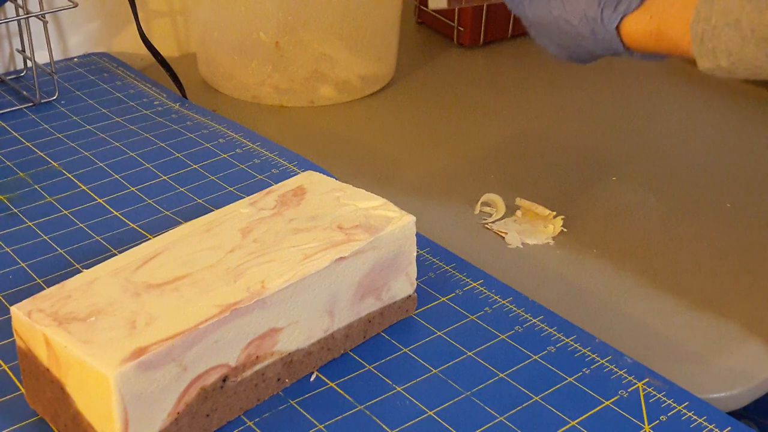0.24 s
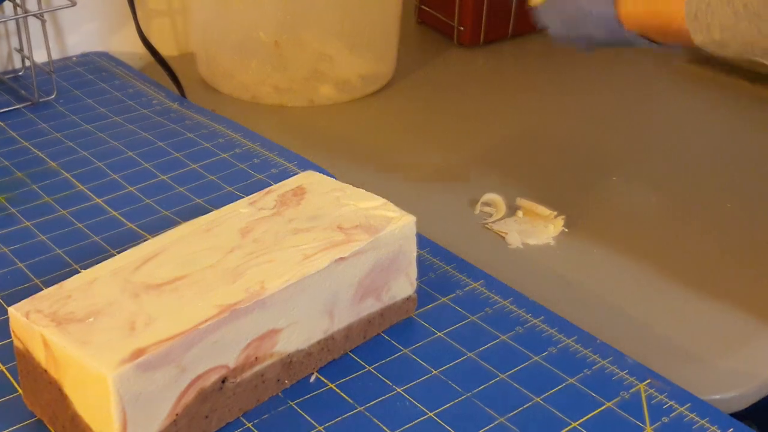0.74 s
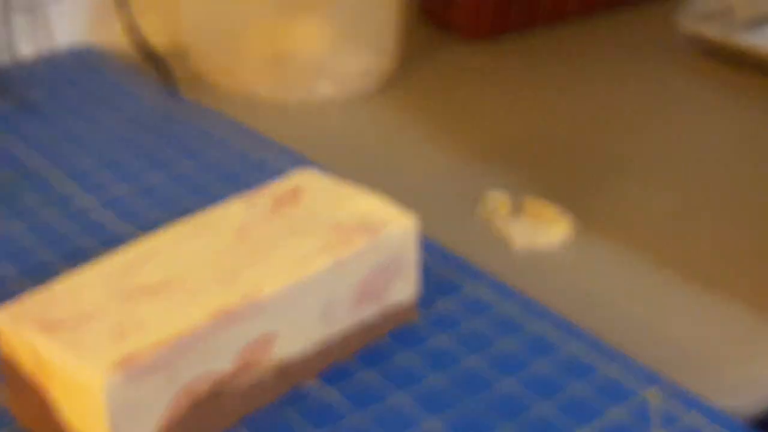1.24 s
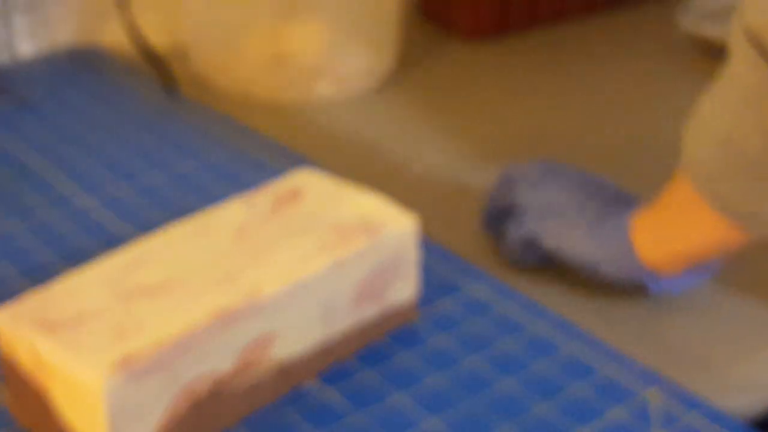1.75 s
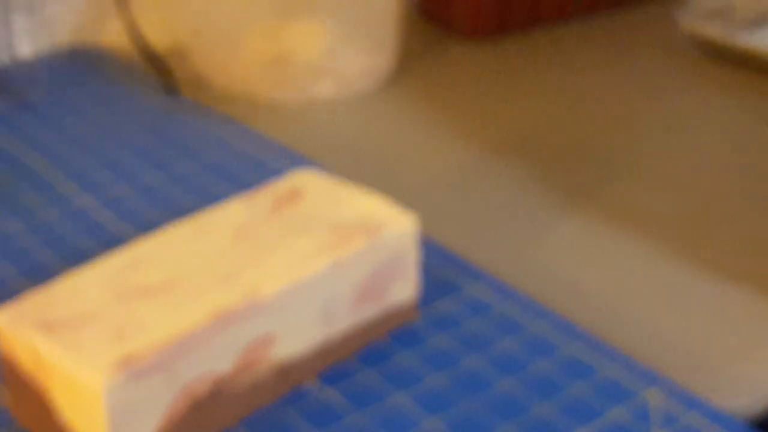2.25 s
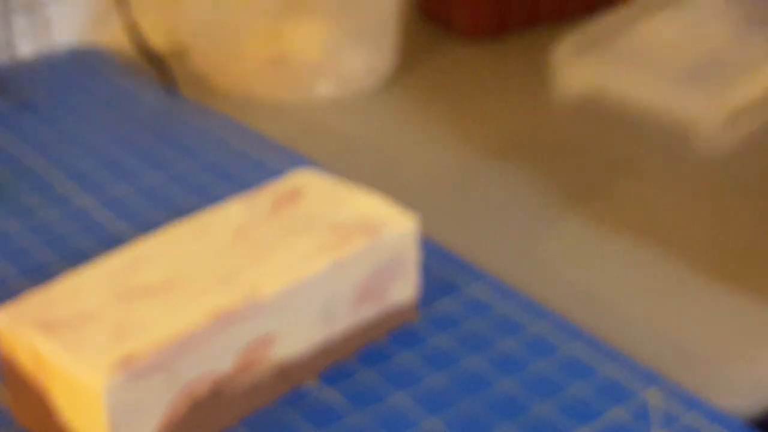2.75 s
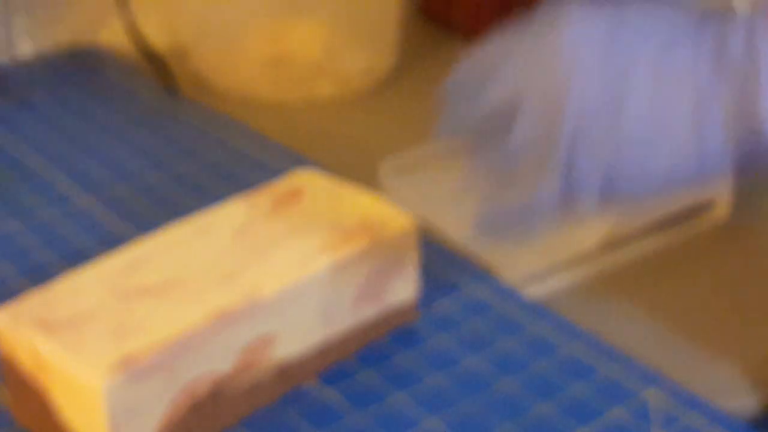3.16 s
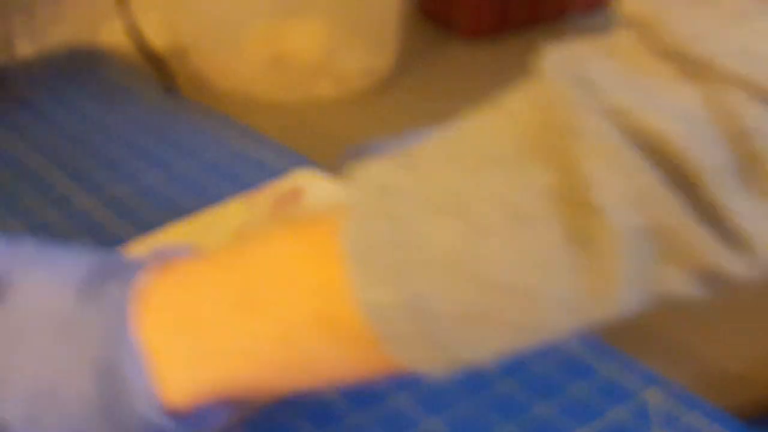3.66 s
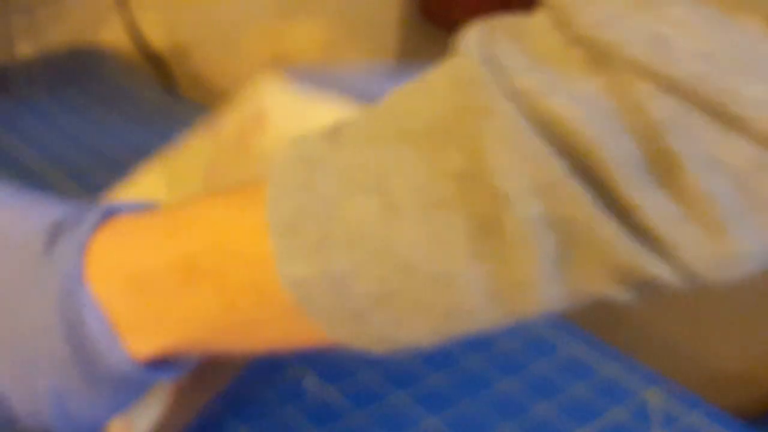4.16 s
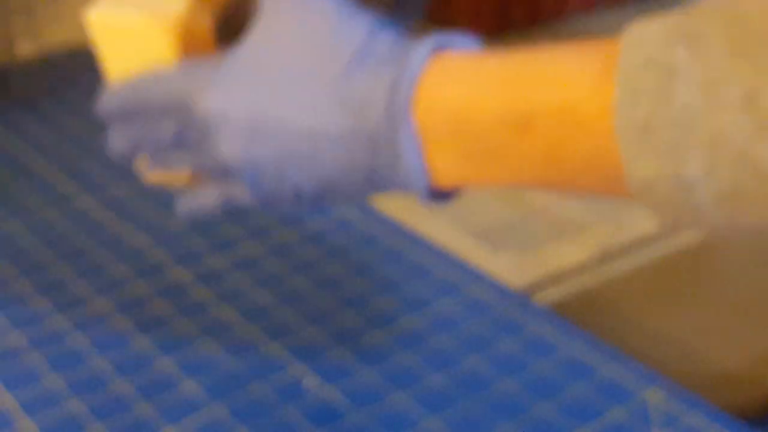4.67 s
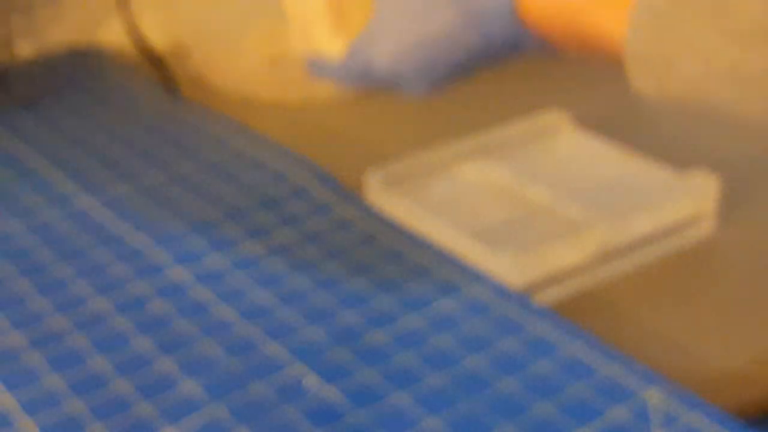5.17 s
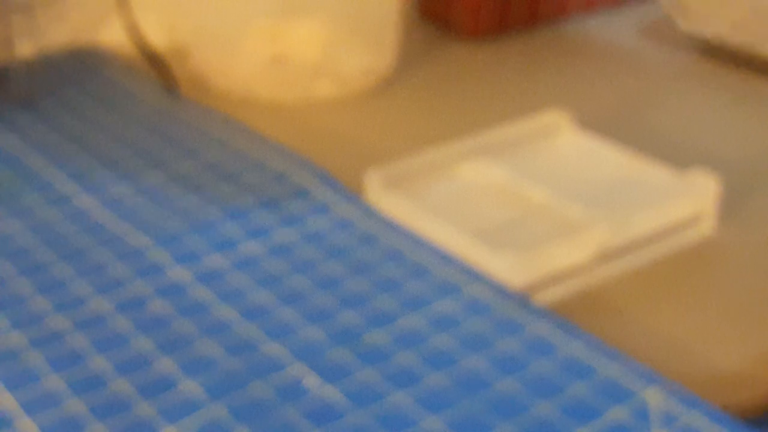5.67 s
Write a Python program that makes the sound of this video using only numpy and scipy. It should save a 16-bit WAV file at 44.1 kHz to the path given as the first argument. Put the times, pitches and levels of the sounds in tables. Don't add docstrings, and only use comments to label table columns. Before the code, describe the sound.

Quiet indoor workroom with soft room tone and a very faint hum. Rubber gloves tick and rustle faintly, then a hand knocks the hollow table and sweeps shavings off with dull thumps and a light scrape. After a pause, an acrylic planer lands, skips and slides with loud hollow clacks. A loaf of soap is gripped and tipped with soft bumps, then it is quiet. Close stereo microphones, slightly left.

```python
import sys
import numpy as np
from scipy import signal
from scipy.fft import rfft, irfft, next_fast_len
from scipy.io import wavfile

SR = 44100
rng = np.random.default_rng(int(sys.argv[2]) if len(sys.argv) > 2 else 0)


def attenuation_scalar(level_db):
    decades = np.asarray(level_db, float) / 20
    return 10 ** decades


def pcm_store(signal):
    levels = np.round(np.clip(np.atleast_2d(signal), -1, 1) * 32767)
    wavfile.write(sys.argv[1], SR, levels.astype(np.int16).T)


N = 261954

# pitch_hz, density_db (per Hz)
AIR_SPECTRUM = [(25, -20), (48, -19.5), (76, -5.5), (141, -8.5), (240, -6), (320, -9.5), (520, -12.5),
                (1000, -10.5), (1600, -17), (3500, -29.5), (7200, -33.5), (9500, -35.5), (12000, -35),
                (14800, -28.5)]
# pitch_hz, correlation (-1 to 1)
AIR_LIKENESS = [(60, 0.77), (130, 0.59), (290, 0.3), (640, -0.067), (1410, 0.11), (3100, -0.16),
                (6820, -0.27), (15000, -0.37)]
# pitch_hz, level_db (rms)
HUM_LINES = [(86.1, -90.5), (344.5, -80), (667.5, -89.5), (866.7, -89), (1034, -91), (1545, -93)]
# start_s, rise_s, level_db, fall_db_per_s
RUSTLES = [
    (.02, 0.02, -81.5, 130),
    (.18, 0.043, -82, 170),
    (.28, 0.0307, -76.5, 90),
    (.59, 0.038, -78.5, 130),
    (.76, 0.058, -84, 120),
    (.97, .04, -93, 11),
    (5.2, .1, -89.5, 148),
]
# start_s, peak_db, pitch_hz
TICKS = [(0.0494, -81, 3430), (0.2204, -69, 3760), (0.2444, -64, 3540), (0.315, -57, 3600),
         (0.362, -64.5, 3700), (0.4394, -68, 3650), (0.615, -60, 3620), (0.634, -62, 3760),
         (4.5142, -76.5, 2510), (5.0479, -71.5, 2630), (5.2955, -64, 7130), (5.7854, -81, 2510),
         (5.8913, -69, 3180)]
# start_s, peak_db, pitch_hz
SNAPS = [(.315, -52, 1285), (.63, -57, 1400), (1.3735, -36, 3000), (1.3785, -23.5, 860), (1.357, -43, 2157),
         (1.931, -49, 1300), (1.835, -46, 1350), (1.843, -32, 1750), (3.428, -25, 1450), (2.567, -50, 895),
         (2.578, -55, 590), (2.592, -33, 890), (2.593, -44.5, 2610), (2.622, -36.5, 1570),
         (3.046, -30, 1500), (3.158, -27, 1601), (3.159, -38, 3206), (3.323, -15, 1402),
         (3.324, -24.5, 2504), (3.371, -7.5, 1278), (3.3712, -17, 2600), (3.3714, -31.5, 5000),
         (3.401, -19, 900), (3.416, -18.5, 1700), (3.573, -54, 1550), (3.601, -32, 1320), (4.106, -45, 76),
         (4.116, -36.5, 1100), (4.1165, -35.5, 1580), (4.117, -49, 2100)]
# start_s, rise_s, pressure_db, fall_db_per_s, hardness_db
SLIDES = [(1.355, 0.015, -41, 233, 8.5), (1.42, .025, -45, 450, -5), (1.67, .02, -60, 100, -13.5),
          (1.74, 0.099, -45, 125, 9.5), (1.9, 0.082, -51, 600, -1.5), (2.56, .01, -50, 300, -1.5),
          (2.6, .04, -56, 600, 5.5), (3.044, .002, -24.5, 99.5, -1), (3.09, .02, -28.5, 149, -3),
          (3.156, .025, -22.5, 220, -1), (3.322, .003, -23.5, 149.5, 3.5), (3.37, .0015, -17, 299.5, 8),
          (3.385, 0.056, -22, 330.5, 2.5), (3.585, .015, -43.5, 209, 0.5), (3.46, 0.03, -56.5, 44.5, -19.5),
          (3.95, .03, -57, 353, -5), (4.104, .004, -43, 326, -2.5)]
# start_s, rise_s, drag_db, fall_db_per_s, coarseness_db
BRUSHES = [(1.354, 0.0038, -61, 151, 3.5), (1.662, 0.012, -79.5, 150, 6.5), (1.74, 0.085, -68, 103, 10),
           (1.85, 0.14, -74, 260, 0), (2.59, 0.048, -73, 186, 1.5), (3.044, .003, -62.5, 45.5, 8.5),
           (3.156, 0.0022, -56, 200, 5), (3.165, 0.017, -65, 153, 14), (3.322, 0.0023, -63, 201.5, 13.5),
           (3.37, .0015, -60, 130.5, 14.5), (3.39, 0.06, -62.5, 173, 8), (3.52, 0.026, -68, 87.5, -11),
           (3.575, 0.02, -62, 162, 2.5), (4.111, 0.0035, -78.5, 247, 8.5)]
# pitch_hz, density_db (per Hz)
CRACK_SPECTRUM = [(1600, -1), (2100, -3), (2600, -3), (3200, -10.5), (4000, -9.5), (5000, -15),
                  (6000, -21.5), (7200, -26)]
# pitch_hz, density_db (per Hz)
DUST_SPECTRUM = [(5000, -7), (6500, -3), (7300, 0), (8100, -7), (9000, 1), (11000, -9), (13000, -11.5),
                 (16000, -7.5)]
# pitch_hz, level_db, t60_s
FRAME_MODES = [(66, -11, .15), (90, -7.5, 0.18), (123.3, -5, 0.48), (150, -1.5, 0.23), (183, 2, 0.14)]
# pitch_hz, level_db, t60_s
TABLE_MODES = [(212, -1, 0.054), (240, -3.5, 0.12), (280, -5, 0.18), (325, 0.5, 0.14), (370.2, -1, 0.15),
               (431, -6, 0.11), (499.8, -3.5, 0.083)]
# pitch_hz, level_db, t60_s
ACRYLIC_MODES = [(549.5, -1.5, 0.1), (620, 1, .08), (703, -1, 0.093), (737, -2.5, 0.052), (818, 3.5, 0.056),
                 (888, 0.5, 0.044), (965, -4, 0.087), (1096, -3, 0.065), (1235, -5.5, 0.041),
                 (1369, -5.5, 0.084), (1500, -6.5, 0.0489), (1700, -8.5, .05), (2010, -11, .04),
                 (2350, -17, .03)]
# start_s, peak_db, favoured_pitch_hz, hardness_db
HAND = [(1.356, -24, 384, -17.5), (1.366, -35, 552, -11.5), (1.372, -25, 280, 10), (1.377, -25, 333, 3.5),
        (1.39, -35, 560, 2), (1.431, -33, 296, 3), (1.678, -48.5, 168, -1), (1.698, -44, 238.2, -6),
        (1.729, -47, 258, -13), (1.773, -39, 394, -12), (1.801, -33.5, 298, 10), (1.814, -26.5, 280, -6),
        (1.827, -23, 483, 6.5), (1.85, -25, 480, 6), (1.864, -29.5, 356, -10), (1.884, -42, 342, -3),
        (1.929, -35, 540, 5), (2.591, -37, 900, 8), (2.624, -42, 337, 8), (2.63, -44, 332.5, -12),
        (2.742, -56, 354, 7)]
# start_s, peak_db, favoured_pitch_hz, hardness_db
LANDING = [(3.045, -14, 336, 1.5), (3.061, -14, 240, -8.5), (3.076, -15.5, 218.5, -7.5),
           (3.087, -15.5, 288, -9), (3.099, -27, 151, -5.5), (3.121, -20.5, 237.6, -3.5),
           (3.157, -16.5, 444, -8.5), (3.167, -9, 282, -11), (3.175, -11, 351, -3), (3.188, -14, 249.8, -4),
           (3.198, -21, 315, -9.5), (3.217, -25.5, 310.8, -7), (3.231, -29.5, 320, -8.5),
           (3.323, -13, 425, 13.5), (3.33, -15.5, 818, 6.5), (3.342, -12.5, 234, -1.5),
           (3.37, -10, 1240, 10.5), (3.377, -17, 791, -0.5), (3.382, -13.5, 676, -0.5),
           (3.401, -11, 291, 6), (3.41, -12.5, 904, 6.5), (3.431, -14, 583, 3), (3.445, -20, 256, -13),
           (3.455, -19, 301, -10), (3.467, -24, 346, -13), (3.484, -25.5, 351, 1)]
# start_s, peak_db, favoured_pitch_hz, hardness_db
LOAF = [
    (3.539, -45, 180, 2),
    (3.6, -39.5, 280, 16.5),
    (3.629, -41.5, 322, -10),
    (3.66, -44, 349, -1),
    (3.968, -49.5, 178, -12),
    (3.998, -58, 337, 1),
    (4.105, -38, 299, 2),
    (4.115, -37.5, 244.6, -7),
    (4.158, -53, 245, -11.5),
]
CONTACTS = HAND + LANDING + LOAF

FIRM_DB = -35
BUSY = slice(int(1.3 * SR), int(4.6 * SR))


def rms_one(x):
    return x / np.sqrt(np.mean(x ** 2) + 1e-20)


def at_hz(points, hz):
    pitch_hz, value = np.array(points).T
    return np.interp(np.log(hz), np.log(pitch_hz), value)


def drift(rate_hz):
    r = np.exp(-80 * np.pi * rate_hz / SR)
    white = rng.standard_normal(N // 40 + 2002)
    slow = signal.lfilter([1], [1, -2 * r, r * r], white)[2000:]
    return np.interp(np.arange(N) / 40, np.arange(len(slow)), rms_one(slow))


def ring(clicks, hz, t60_s):
    pole = attenuation_scalar(-60 / (t60_s * SR)) * np.exp(2j * np.pi * hz / SR)
    return signal.lfilter([1], [1, -pole], clicks + 1e-18).imag


def strokes(rows, firm_db, follows, per_hard):
    t, out = np.arange(0, N, 16) / SR, -200
    for start_s, rise_s, db, fall, *hard in rows:
        end_s = start_s + rise_s
        rise_loss_db = 23.5 * (1 - (t - start_s) / rise_s) ** 2
        pressure_db = db - np.where(t < end_s, rise_loss_db, fall * (t - end_s))
        level_db = firm_db + follows * (pressure_db - FIRM_DB) + per_hard * sum(hard)
        out = np.maximum(out, np.where(t >= start_s, level_db, -200))
    return np.interp(np.arange(N) / SR, t, attenuation_scalar(out))


def banded(white, spectrum, low_hz, top_hz, patchy_db, direct):
    out, power = 0, 0
    edges = low_hz * 2 ** (np.arange(40) / 3)
    edges = edges[edges < min(top_hz, .45 * SR)]
    for k, (low, high) in enumerate(zip(edges, edges[1:])):
        band = signal.butter(2, [low, high], "band", fs=SR, output="sos")
        mid, side = signal.sosfilt(band, white[k % 2])
        hz = np.sqrt(low * high)
        alike = np.clip(at_hz(AIR_LIKENESS, hz) + direct, -1, 1)
        gain = attenuation_scalar(at_hz(spectrum, hz))
        power += gain ** 2 * (high - low) * 4.4 / SR
        stereo = np.sqrt(1 + alike) * mid + np.sqrt(1 - alike) * side * [[1], [-1]]
        out = out + gain * attenuation_scalar(patchy_db * drift(8)) * stereo
    return out / np.sqrt(power)


def room_tone():
    white = rng.standard_normal((2, 2, N))
    return attenuation_scalar(-68.5) * banded(white, AIR_SPECTRUM, 25, 18000, patchy_db=.7, direct=0)


def hum():
    t, out = np.arange(N) / SR, 0
    for hz, db in HUM_LINES:
        level = np.sqrt(2) * attenuation_scalar(db + 2.5 * drift(2))
        between = rng.uniform(0, 3, (2, 1)) * hz / 1500
        out = out + level * np.sin(2 * np.pi * hz * t + 0.79 * drift(2) + between)
    return out


def room(x):
    size = next_fast_len(N + SR)
    w = 2 * np.pi * np.arange(size // 2 + 1) / size
    wall_cut_hz = 3100
    t60_s = 0.3 / (1 + w * SR / (2 * np.pi * wall_cut_hz))
    echo = 0
    for k, lag in enumerate(rng.uniform(.011, .045, (8, 2, 1)) * SR):
        loop = attenuation_scalar(-60 * lag / SR / t60_s) * np.exp(-1j * w * lag)
        echo = echo + (-1) ** k * loop / (1 - loop)
    return irfft(rfft(x.mean(0), size) * echo, size)[:, :N]


def gloves(rustle):
    white = rng.standard_normal((2, N))
    noise = rms_one(signal.lfilter(*signal.iirpeak(3700, 5.5, fs=SR), white))
    return noise * rustle * attenuation_scalar(-2.5)


def taps(rows, offset_db, cycles):
    length = 3000
    out = np.zeros((2, N + length))
    lags_s = rng.normal(0, 0.000091, len(rows))
    for (start_s, peak_db, hz, *_), lag in zip(rows, lags_s):
        t = np.maximum(np.arange(length) / SR - abs(lag) + lag * np.array([[1], [-1]]), 0)
        shape = attenuation_scalar(-60 * t * hz / cycles) * (1 - np.exp(-t * hz * 5.5))
        tone = shape * np.sin(2 * np.pi * hz * t)
        out[:, round(start_s * SR):][:, :length] -= attenuation_scalar(peak_db + offset_db) * tone
    return out[:, :N]


def cracks(hiss, dust):
    rows, ticks, burst = np.array(CONTACTS), np.array(TICKS), np.zeros(N)
    crack_db = -55.5 + 0.86 * (rows[:, 1] - FIRM_DB) + .25 * rows[:, 3]
    burst[np.round(rows[:, 0] * SR).astype(int)] = attenuation_scalar(crack_db - 8.5)
    burst[np.round(ticks[:, 0] * SR).astype(int)] = attenuation_scalar(ticks[:, 1] - 11.5)
    burst = signal.lfilter([1], [1, -attenuation_scalar(-60 / (.025 * SR))], burst + 1e-18)
    grain, white = attenuation_scalar(2.5 * drift(120)), rng.standard_normal((2, 2, N))
    bright_level = np.hypot(burst, hiss * grain * attenuation_scalar(6.5))
    fine_level = np.hypot(burst * attenuation_scalar(-24), dust * grain)
    bright = banded(white * bright_level, CRACK_SPECTRUM, 1500, 8000, patchy_db=3.5, direct=0.36)
    fine = banded(white[::-1] * fine_level, DUST_SPECTRUM, 4840, 18000, patchy_db=0.35, direct=0.17)
    port = signal.lfilter(*signal.iirpeak(7250, 14., fs=SR), fine)
    upper = signal.lfilter(*signal.iirpeak(8850, 18., fs=SR), fine)
    notched = signal.lfilter(*signal.iirnotch(8100, 16., fs=SR), bright + fine)
    return notched + .9 * port + .5 * upper


def body(modes, hit_db, slide, slide_db, slips_per_s):
    start_s, _, pitch_hz, _ = np.array(CONTACTS).T
    at, out = np.round(start_s * SR).astype(int), np.zeros((2, N))
    slips = (rng.random(N) < slips_per_s / SR) * attenuation_scalar(2.5 * np.minimum(rng.exponential(1, N), 4))
    where = np.flatnonzero(slips)
    slips = (rms_one(slips) * slide * attenuation_scalar(slide_db))[where]
    chance = rng.standard_normal((len(at), len(modes), 2))
    lean = 1.155
    for k, (hz, level_db, t60_s) in enumerate(modes):
        spread = min((hz / 550) ** 3, 1500 / hz + 0.27) * np.array([[.5j], [-.5j]])
        favour_db = 11 * np.exp(-(np.log(hz / pitch_hz) / 0.074) ** 2)
        force = np.zeros((2, N), complex)
        size, turn = rng.standard_normal((2, len(where)))
        force[:, where] = slips * size * np.exp(spread * (lean + 0.72 * turn))
        knock = (-1) ** k * attenuation_scalar(hit_db + favour_db + 1.4 * chance[:, k, 0])
        force[:, at] = knock * np.exp(spread * (lean + 0.69 * chance[:, k, 1]))
        contact = np.exp(-2 * np.pi * 3.3 * hz / SR)
        clicks = signal.lfilter([1 - contact], [1, -contact], force[:, BUSY] + 1e-18)
        out[:, BUSY] += attenuation_scalar(level_db) * ring(clicks, hz, t60_s)
    return out


def scene():
    _, peak_db, _, hardness_db = np.array(CONTACTS).T
    frame = strokes(SLIDES, firm_db=-45, follows=.85, per_hard=-0.75)
    table = strokes(SLIDES, firm_db=-34.5, follows=0.99, per_hard=-.1)
    acrylic = strokes(SLIDES, firm_db=-39.5, follows=.9, per_hard=0.96)
    hiss = strokes(BRUSHES, firm_db=-30, follows=1.185, per_hard=.98)
    dust = strokes(BRUSHES, firm_db=-36.5, follows=0.93, per_hard=-.05)
    rustle = strokes(RUSTLES, firm_db=FIRM_DB, follows=1, per_hard=0)
    low_db = peak_db - 11.5 - 0.5 * hardness_db
    high_db = peak_db - 10 + 0.46 * hardness_db
    near = body(FRAME_MODES, low_db - 27, frame, slide_db=-33.5, slips_per_s=150)
    near += body(TABLE_MODES, low_db - 8.5, table, slide_db=-32.5, slips_per_s=400)
    near += body(ACRYLIC_MODES, high_db - 8, acrylic, slide_db=-31, slips_per_s=1200)
    near += taps(CONTACTS, offset_db=-2.5, cycles=12)
    near += taps(TICKS, offset_db=3, cycles=29.4)
    near += taps(SNAPS, offset_db=3, cycles=9.5)
    near += cracks(hiss + rustle * attenuation_scalar(-7), dust + rustle * attenuation_scalar(-6.5))
    near += gloves(rustle)
    near = signal.sosfilt(signal.butter(4, 62, "high", fs=SR, output="sos"), near)
    placed = near * attenuation_scalar(1.3 * np.array([[1], [-1]]))
    return placed + attenuation_scalar(-20) * room(near) + room_tone() + hum()


def low_pass(x):
    return signal.sosfilt(signal.butter(12, 16310, fs=SR, output="sos"), x)


def record(dry):
    cut = signal.sosfilt(signal.ellip(10, .3, 60, 15700, fs=SR, output="sos"), dry)
    mix = cut - .00046
    return low_pass(mix)


dry = scene()
out = record(dry)
pcm_store(out)
```